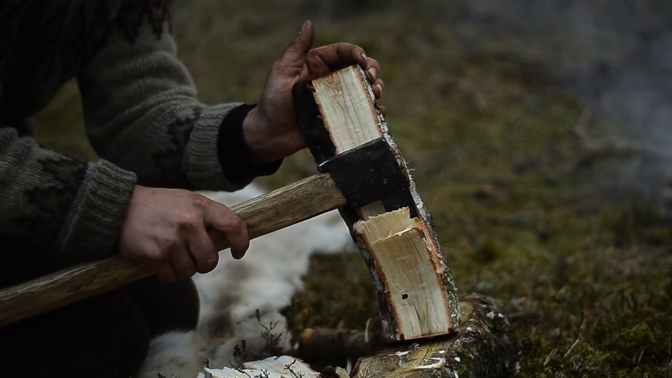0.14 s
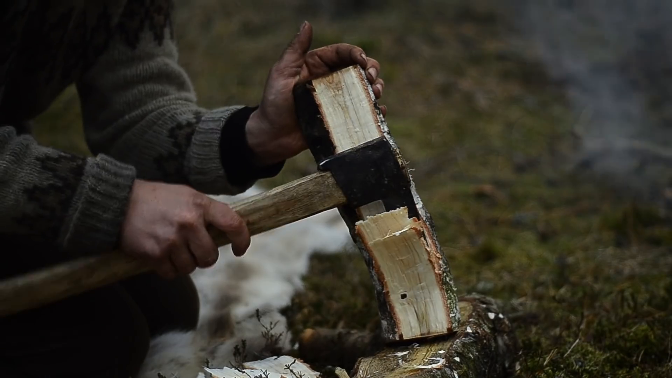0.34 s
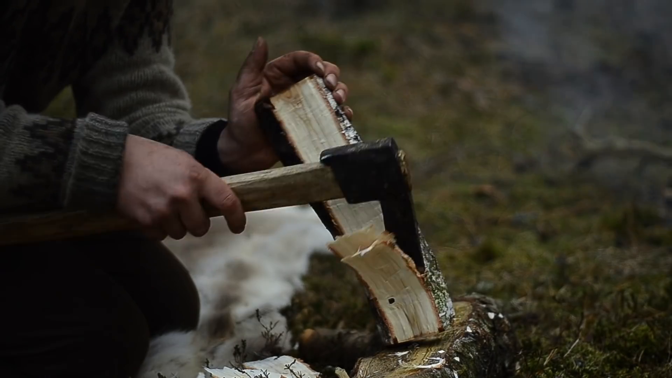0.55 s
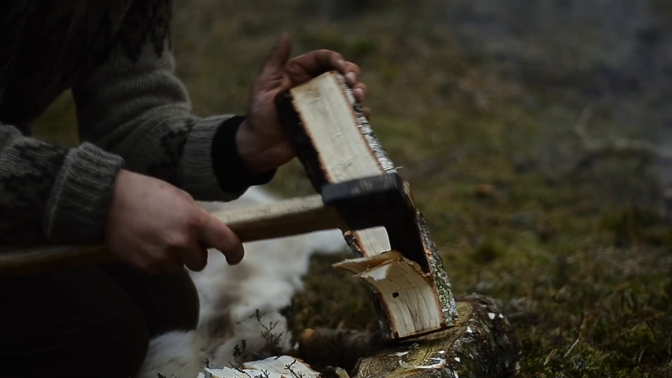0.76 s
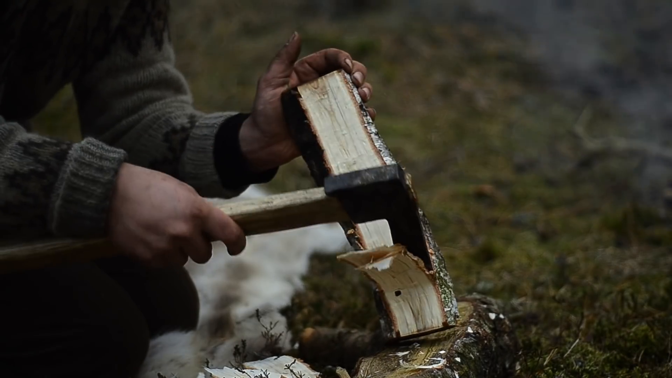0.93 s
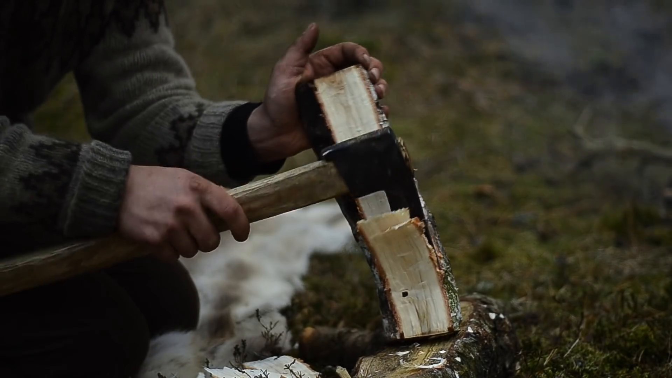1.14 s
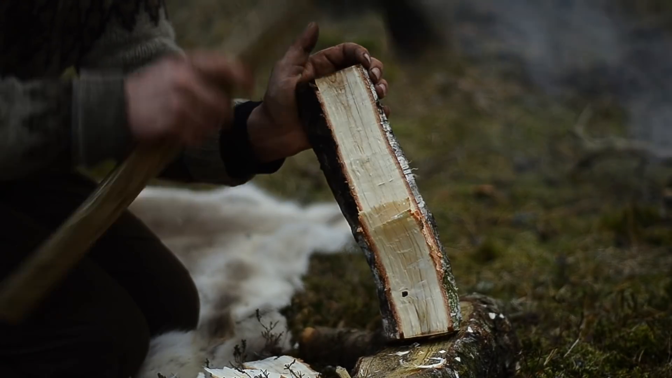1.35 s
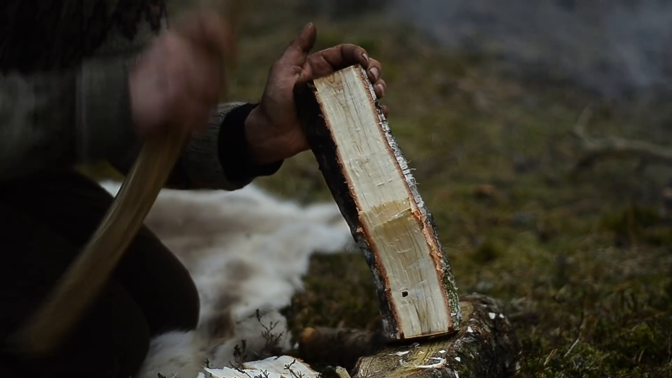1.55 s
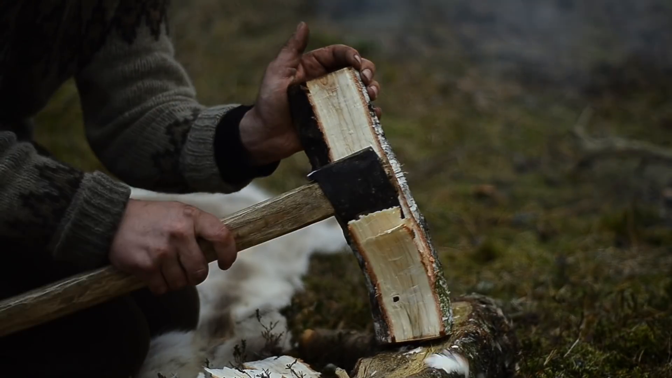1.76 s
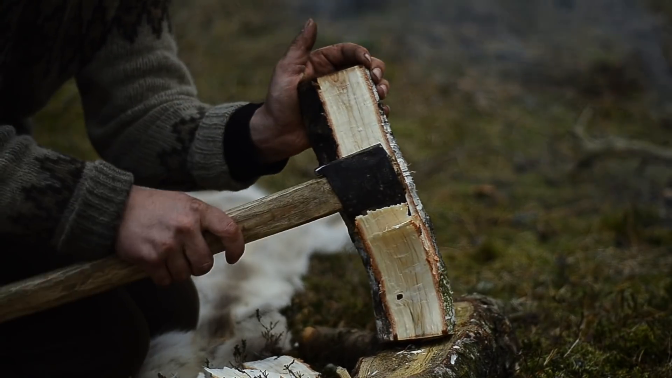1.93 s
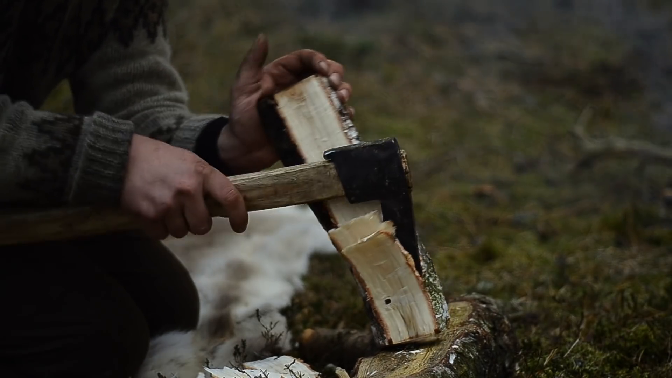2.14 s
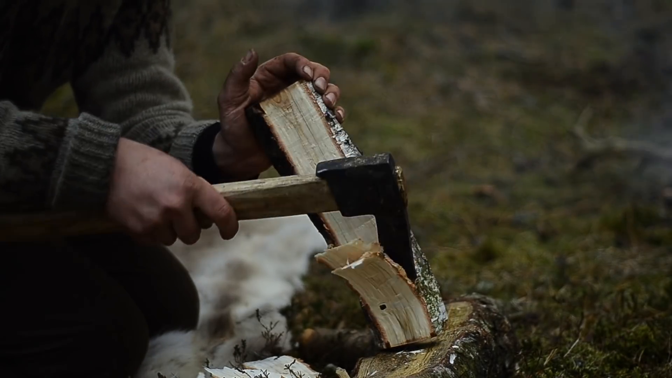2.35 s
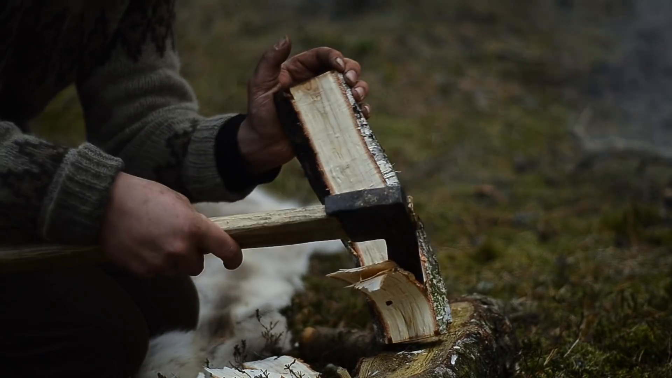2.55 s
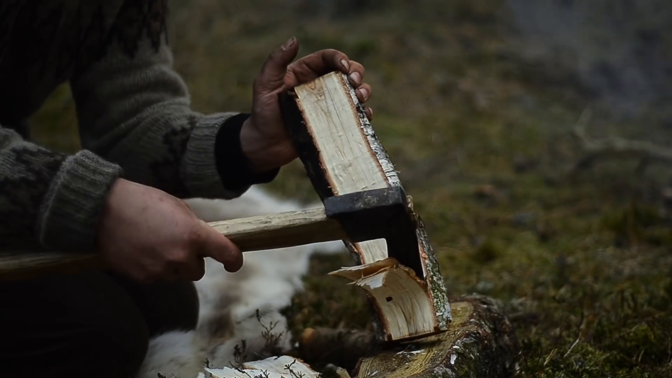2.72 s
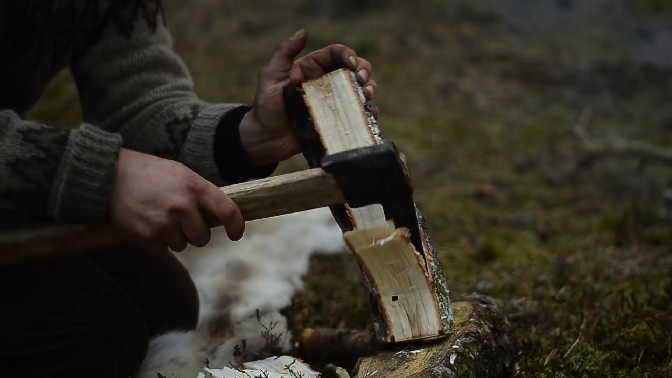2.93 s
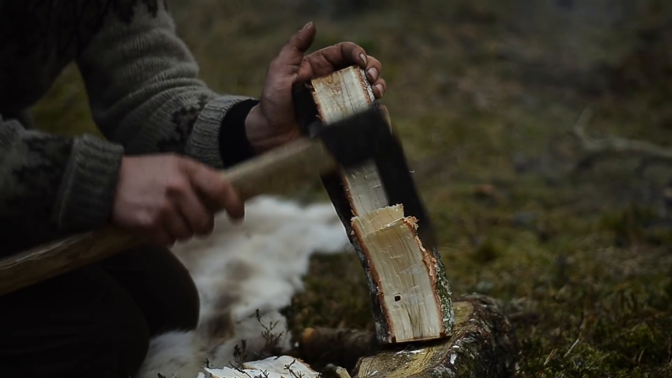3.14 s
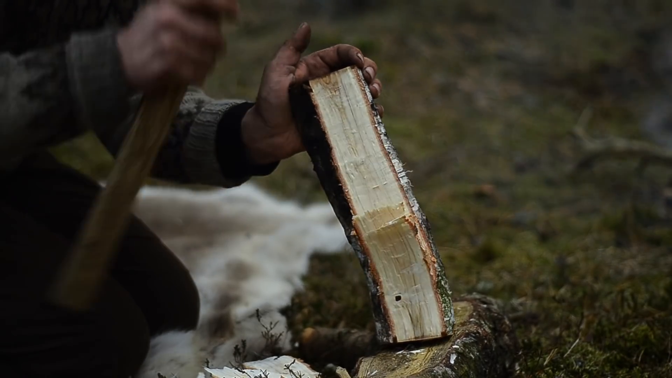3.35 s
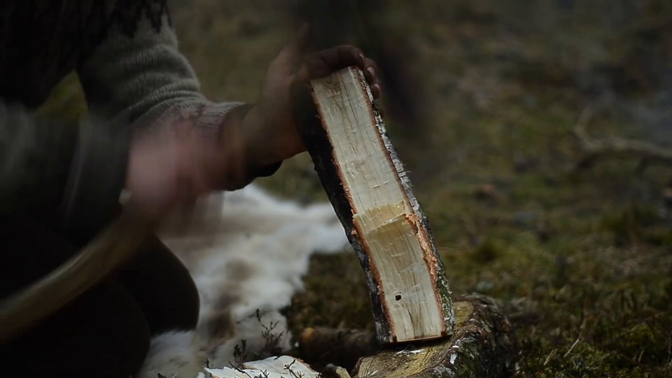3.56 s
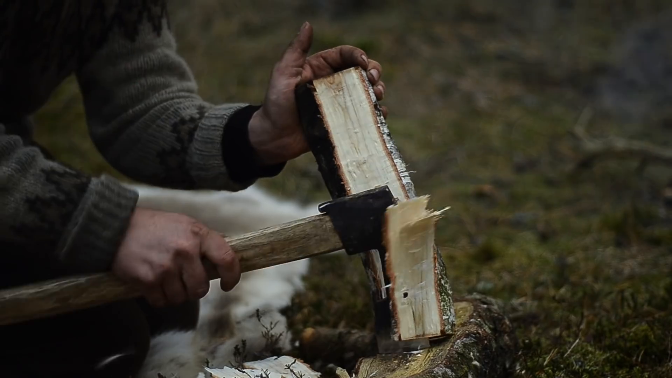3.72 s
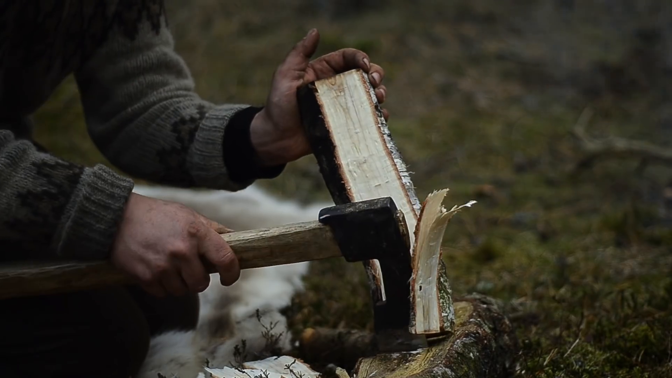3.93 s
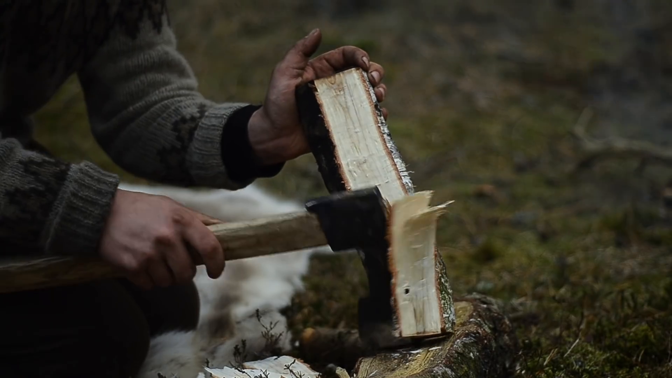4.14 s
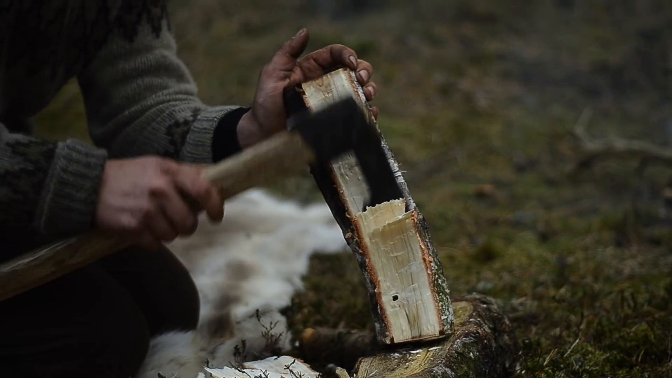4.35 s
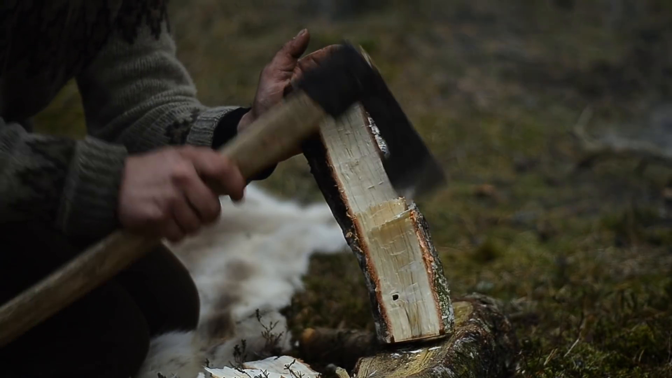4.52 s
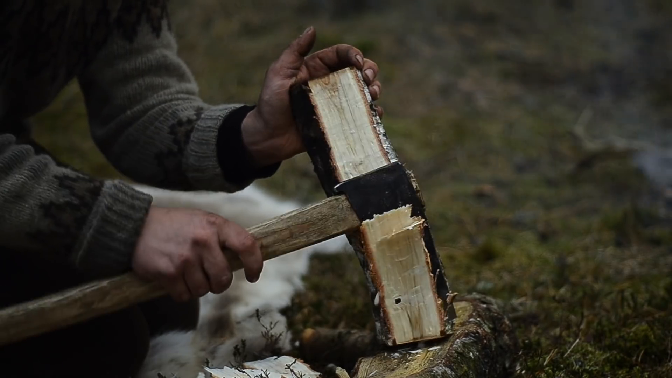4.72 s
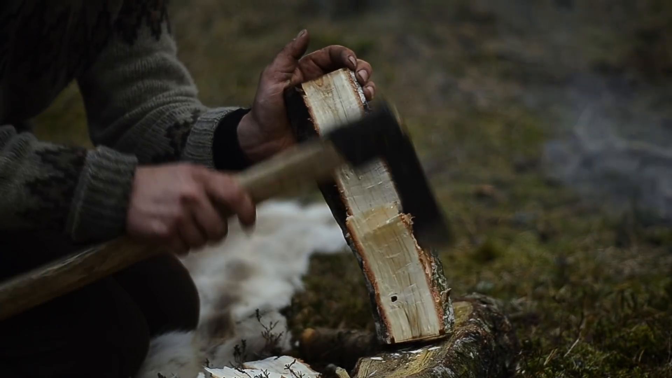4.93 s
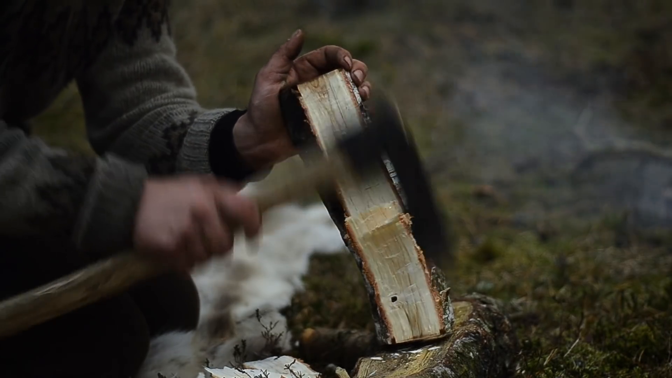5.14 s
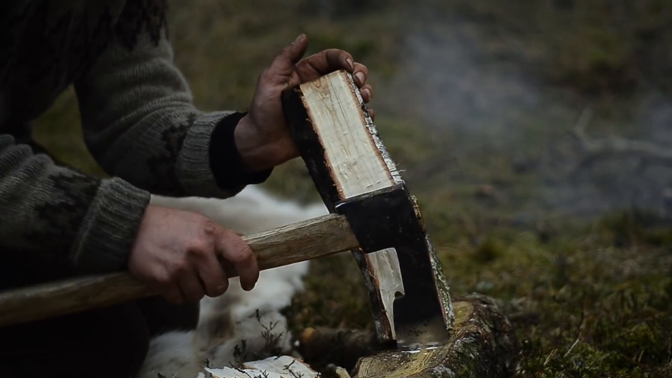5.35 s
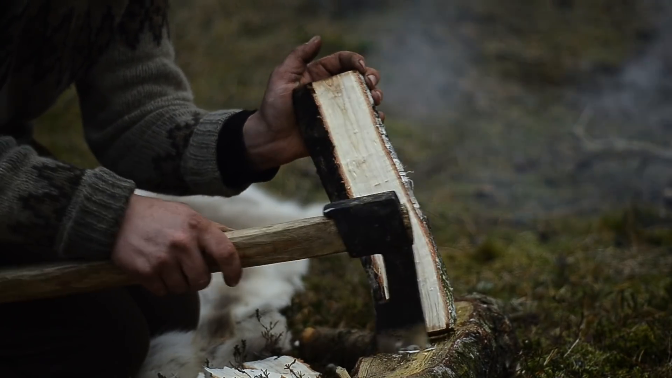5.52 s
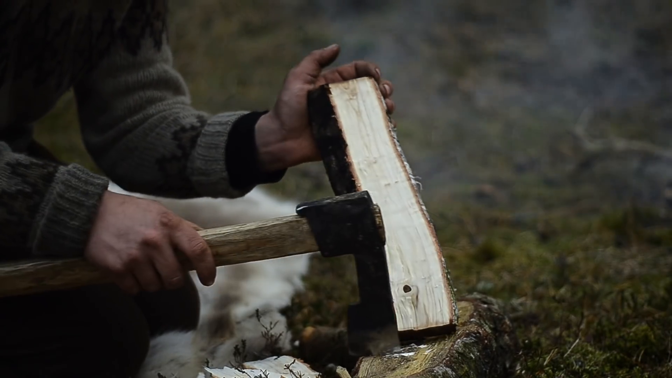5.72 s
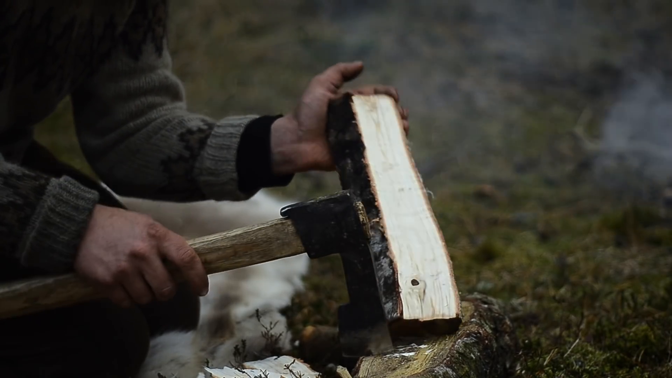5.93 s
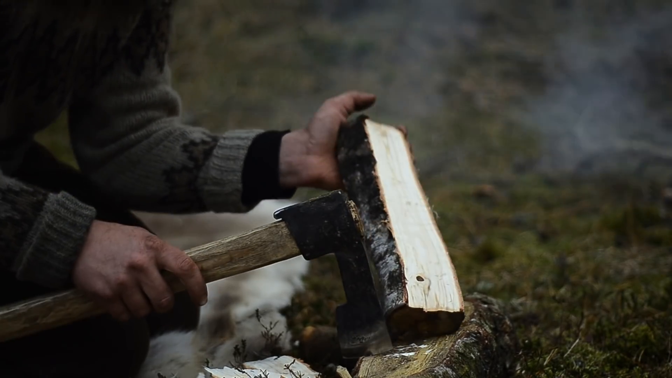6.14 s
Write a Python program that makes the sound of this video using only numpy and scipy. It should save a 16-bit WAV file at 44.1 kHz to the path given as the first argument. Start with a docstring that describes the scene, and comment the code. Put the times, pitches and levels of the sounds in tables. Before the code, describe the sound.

Outdoors and very close, a hand axe bites into a log with a loud, crunchy, overloaded wooden crack. Fibres snap as the blade is twisted. A second heavy blow follows, then a third that bites and knocks the block, with descending creaks. Smaller knocks and a soft scrape lead to a hollow thump as the slab gives way, then faint rubbing and one thin squeak. Soft air hush and slight echo.

```python
"""Outdoors, close to the microphone, a hand axe splits slabs off an upright log on a chopping block.
Heavy blows, made of crushed fibres and ringing wood, overload the recorder. Between them the blade is
twisted, fibres snap as short clicks, and steel rubs on wood as grainy noise, creaking and squeaking.
When a slab gives way the axe drives through and knocks on the block with a short hollow ring.
A soft hush and a faint echo lie behind it all."""
import sys
import numpy as np
from scipy import signal
from scipy.io import wavfile
from scipy.ndimage import uniform_filter1d

SR = 44100
rng = np.random.default_rng(int(sys.argv[2]) if len(sys.argv) > 2 else 0)


def dump(signal):
    """Clip the signal to [-1, 1] and save it as 16-bit WAV at the path in sys.argv[1]."""
    limited = np.clip(np.atleast_2d(signal).T, -1, 1)
    pcm = np.round(limited * 32767).astype(np.int16)
    wavfile.write(sys.argv[1], SR, pcm)


N = 272538  # samples in the whole scene


def amp(db):
    """Turns decibels into a gain."""
    return 10 ** (np.asarray(db) / 20)


def evened(x):
    """Scales a sound to an average (rms) strength of 1."""
    return x / np.sqrt(np.mean(x ** 2) + 1e-20)


def read_curve(points, hz):
    """Reads a curve between its points, along a logarithmic frequency axis."""
    f, value = np.transpose(points)
    return np.interp(np.log(hz + 1), np.log(f), value)


def add(mix, start_s, sound):
    """Mixes a sound in at its start time."""
    part = mix[round(start_s * SR):][:len(sound)]
    part += sound[:len(part)]


def clock(size=8192):
    """Seconds since the start of an event."""
    return np.arange(size) / SR


def dying(t, t60):
    """Falls by 60 dB in t60 seconds."""
    return np.exp(-np.log(1000) * t / t60)


def colour(x, points, size=4096):
    """Filters a sound to a given spectrum without smearing it to before its start."""
    hz = abs(np.fft.fftfreq(size, 1 / SR))
    log_gain = np.log(amp(read_curve(points, hz)))
    # minimum phase: the filter answers as early as it can
    response = np.exp(np.conj(signal.hilbert(log_gain)))
    taps = np.fft.ifft(response).real[:size // 2]
    return signal.fftconvolve(x, taps)[:len(x)]


def band(x, hz, spread):
    """Passes hz / spread to hz * spread, with soft skirts."""
    edges = [hz / spread, hz * spread]
    return signal.sosfilt(signal.butter(2, edges, "band", fs=SR, output="sos"), x)


def grains(size, grain_db):
    """Noise made of tiny slips of unequal strength, each 16 samples long."""
    strength = np.repeat(rng.standard_normal(size // 16 + 1), 16)[:size]
    return evened(rng.standard_normal(size) * amp(grain_db * np.clip(strength, -2, 2)))


def ring(modes, pitch=1, contact_hz=4500, sign=1):
    """Fading tones after one blow, rounded off by the give of the wood."""
    t = clock()
    swing = np.zeros(len(t))
    for k, (hz, db, t60) in enumerate(modes):
        # with sign -1, neighbouring tones start in opposite directions
        swing += sign ** k * amp(db) * dying(t, t60) * np.cos(2 * np.pi * hz * pitch * t)
    return signal.lfilter(*signal.butter(1, contact_hz, fs=SR), swing)


# the axe bites into the log:
# (time [s], level [dB], factor on the log's pitches [ratio], crunch level [dB], crunch t60 [s])
BITE_EVENTS = [(0.0016, -2.5, 0.921, -0.5, 0.0542), (1.7037, 2, 0.9686, 1, 0.03314),
               (3.659, -2.5, 1.0, 0, 0.0732), (3.6634, -1, 0.8575, -4.5, 0.046)]
# tones of the log before the pitch factor: (frequency [Hz], level [dB], t60 [s])
LOG_MODES = [(357, -21, 0.03), (590, -16, 0.021), (856.8, -1, 0.037), (1066, -11, 0.029),
             (1233.2, -2, 0.021), (1314, -12, .018), (1770.4, -5.5, 0.045), (2200, -6, 0.011),
             (3000, -12, 0.004), (4500, -13, 0.002)]
# tone colour of crushed fibres: (frequency [Hz], relative level per Hz [dB])
CRUNCH_SPECTRUM = [(30, -9.5), (150, -9.5), (400, -1), (900, 3.5), (2300, 4.5), (4800, -7.5), (8000, -17),
                   (15000, -20.5)]


def bites():
    """The edge crushes fibres for some milliseconds, shoves the log down and sets it ringing."""
    out, t = np.zeros(N), clock()
    shove = push(t, rise=0.0015)
    for start_s, db, pitch, crunch_db, t60 in BITE_EVENTS:
        crunch = evened(colour(grains(len(t), grain_db=2.5), CRUNCH_SPECTRUM)) * dying(t, t60)
        log = ring(LOG_MODES, pitch, sign=-1)
        blow = amp(1.5) * log + amp(crunch_db - 0.28) * crunch + amp(-3.5) * shove
        add(out, start_s, amp(db) * blow)
        add(out, start_s, amp(db) * rumble())
    return out


def push(t, rise):
    """The shove of the axe's weight: a low pulse that swings over as it fades."""
    return (1 - t / rise / 2) * t / rise * np.exp(-t / rise)


def rumble(level_db=-42, t60=0.45, top_hz=58):
    """A faint deep-bass rumble, below about 60 Hz, follows a heavy blow and fades."""
    t = clock(size=22050)
    lowpass = signal.butter(2, top_hz, fs=SR, output="sos")
    low = signal.sosfilt(lowpass, rng.standard_normal(len(t)))
    return amp(level_db) * evened(low) * dying(t, t60)


# knocks on the block: (time [s], force [dB], how squarely the blow lands [0-1])
KNOCK_EVENTS = [(0.0075, -14, 0.86), (0.043, -36, 0.75), (0.092, -41.5, 1), (0.4307, -39.5, 0.98),
                (3.683, -3.5, .6), (3.8945, -39, 0.39), (4.2790, -41, .05), (4.6540, -12.5, 0.24),
                (5.2193, -20, 0.04), (5.2618, -3, 0.93), (5.3622, -25.5, 0.32), (5.421, -36.5, 0),
                (5.647, -26, 0)]
# hollow ring of a blow that drives through: (frequency [Hz], level [dB], t60 [s])
HOLLOW_MODES = [(995, -4, 0.046), (1069, -25.5, 0.084), (2050, -34, 0.042), (2589, -36.5, 0.073),
                (4450, -37, 0.027)]
# steel head of the axe: (frequency [Hz], level [dB], t60 [s])
STEEL_MODES = [(2400, -22.5, .05), (4500, -23.5, 0.059)]
GIVE_HZ = 5000  # the block yields, so a knock rings little above this
HOLLOW_DB = 9.5  # a square blow rings above its thud
# the crack of contact grows more slowly than the force, and is duller in a harder blow
CRACK_DB, CRACK_GROWTH = -14.5, 0.66  # level at 0 dB force [dB]; dB of crack per dB of force
CRACK_HZ, CRACK_FALL_HZ_PER_DB = 1090, 14.5  # centre at 0 dB force; fall with force


def knocks():
    """A brief crack that stings the steel, the block's thud and, the squarer the hit, a hollow ring."""
    out, t = np.zeros(N), clock()
    give = signal.butter(2, GIVE_HZ, fs=SR, output="sos")
    sources = [thud(), ring(HOLLOW_MODES, contact_hz=2460), ring(STEEL_MODES)]
    block, hollow, steel = signal.sosfilt(give, sources)
    for start_s, db, square in KNOCK_EVENTS:
        crack_hz = CRACK_HZ - CRACK_FALL_HZ_PER_DB * db
        crack = evened(band(rng.standard_normal(len(t)), crack_hz, 2.3)) * dying(t, 0.022)
        contact = amp(CRACK_DB + CRACK_GROWTH * db) * (crack + amp(-6) * steel)
        through = square * amp(db + HOLLOW_DB)
        add(out, start_s, amp(db) * block + through * hollow + contact)
        add(out, start_s, through * amp(-8) * rumble())
    return out


# dull tones of the block: (frequency [Hz], level [dB], t60 [s])
BLOCK_MODES = [(215, -16, 0.028), (301, -10, .04), (360, -7, 0.032), (474, -6, 0.028), (551, -4.5, 0.026),
               (724, -6.5, 0.015), (920, -10, 0.0053)]


def thud(lowest_hz=235):
    """The block's answer to a blow; it is too small to radiate deep bass."""
    highpass = signal.butter(2, lowest_hz, "high", fs=SR, output="sos")
    return signal.sosfilt(highpass, ring(BLOCK_MODES, contact_hz=1480))


# thick fibres snap: (time [s], relative level [dB], centre frequency [Hz])
SNAP_EVENTS = [(0.6871, -21.5, 2520), (0.7420, -18.5, 5230), (0.7717, 0, 3050), (0.8330, -12, 1957),
               (1.6940, -0.5, 2680), (2.1038, -17, 2100), (2.535, -15.5, 4030), (2.5404, -8.5, 3010),
               (2.542, -7, 2720), (2.6032, -18.5, 5890), (2.6350, -14, 6500), (3.093, -11.5, 2430),
               (3.8277, -13, 2580), (3.8355, -19, 4550), (4.3502, -33, 2780), (4.8004, -30.5, 1590),
               (4.8782, -27.5, 3500), (5.2427, -11, 1100), (5.3190, -17.5, 1660), (5.421, -22.5, 4040)]


def snaps():
    """The thick fibres that give way one by one."""
    out = np.zeros(N)
    for start_s, db, hz in SNAP_EVENTS:
        add(out, start_s, snap(db, hz))
    return out


def snap(db, hz):
    """A fibre breaks with one sharp click; the wood around it rattles for a few milliseconds."""
    t = clock(size=2048)
    force = 0.17 * rng.standard_normal(len(t)) * dying(t, 0.011)
    force[0] += 1  # the break itself
    click = band(force, hz, 1.7) + amp(-10.5) * band(force, 2.2 * hz, 1.4)
    # the louder the snap, the larger the log's share in it
    body = amp(-33 + 0.25 * db) * ring(LOG_MODES)[:len(t)] * dying(t, 0.067)
    return amp(db + 7.5) * (click / np.linalg.norm(click) + body)


# the blade is twisted in the cleft:
# (time of greatest strain [s], reach before and after [s], relative level [dB])
TWIST_EVENTS = [(0.791, 0.0595, -23), (1.17, 0.156, -44), (2.4, 0.0443, -32), (2.51, 0.0792, -22.5),
                (2.73, .04, -30.5), (3.786, 0.0493, -21.5), (4.329, .14, -39.5), (4.711, .04, -25.5),
                (5.47, 0.0883, -38.5)]
CRACKLE_GAP_S = 0.014  # mean spacing
CRACKLE_FADE_DB = -16  # drop at the ends of a twist
# the random scatter reaches about twice each spread
CRACKLE_SPREAD_DB = 3.5
CRACKLE_HZ, CRACKLE_SPREAD_OCTAVES = 3363, 0.47


def crackle(count=20):
    """Thin fibres break at uneven intervals in each twist, on average loudest where the strain peaks."""
    out, steps = np.zeros(N), np.arange(-count, count)
    for peak_s, reach, db in TWIST_EVENTS:
        offsets = CRACKLE_GAP_S * (steps + rng.random(len(steps)))
        fibres = rng.uniform(-2, 1.97, (len(steps), 2))
        for offset, (strength, thinness) in zip(offsets, fibres):
            if abs(offset) < reach:
                level = db + CRACKLE_FADE_DB * abs(offset) / reach + CRACKLE_SPREAD_DB * strength
                hz = CRACKLE_HZ * 2 ** (CRACKLE_SPREAD_OCTAVES * thinness)
                add(out, peak_s + offset, snap(level, hz))
    return out


# the half-split slab creaks in single slips: time of each [s]
CREAK_TIMES = [3.7404, 3.7433, 3.7742, 3.7970, 3.9290, 4.0055]
# relative level and pitch of the first slip, and how fast both sink
CREAK_DB, CREAK_FADE_DB_PER_S = -23.5, 46
CREAK_HZ, CREAK_SAG_HZ_PER_S = 1906, 1090


def creaks(t60=0.00816, rise=0.000457):
    """Each slip plucks the slab, whose note weakens and sinks as the split grows longer."""
    out, t = np.zeros(N), clock(size=2048)
    for start_s in CREAK_TIMES:
        age = start_s - CREAK_TIMES[0]
        hz = CREAK_HZ - CREAK_SAG_HZ_PER_S * age
        note = np.sin(2 * np.pi * hz * t) * (1 - np.exp(-t / rise)) * dying(t, t60)
        rasp = band(rng.standard_normal(len(t)), 2520, 2.12) * dying(t, 0.0099)
        level = amp(CREAK_DB - CREAK_FADE_DB_PER_S * age)
        add(out, start_s, level * (amp(9.5) * note + amp(-11.5) * rasp))
    return out


# the blade tears along the grain:
# (time [s], approximate length [s], relative level [dB], centre frequency [Hz])
TEAR_EVENTS = [(1.689, 0.0113, -19.5, 2750), (2.12, 0.0293, -42, 1900), (4.662, 0.0392, -25, 2200),
               (5.2336, 0.034, -19.5, 1563), (5.25, 0.011, -23.5, 3500), (5.323, 0.0279, -35.5, 3340)]


def tears(block_db=-8):
    """Dense runs of breaking fibres as the wedge runs down the grain; the block murmurs along."""
    out, t = np.zeros(N), clock()
    for start_s, length, db, hz in TEAR_EVENTS:
        slips = grains(len(t), grain_db=4.5)
        murmur = evened(signal.fftconvolve(slips, thud())[:len(t)])
        run = evened(band(slips, hz, 2.1)) + amp(block_db) * murmur
        swell = (1 - np.exp(-t / (0.25 * length))) * np.exp(-(t / (0.85 * length)) ** 3)
        add(out, start_s, amp(db + 1.5) * run * swell)
    return out


# strokes of steel and hand on the wood:
# (time when pressed hardest [s], level [dB], time to fade by 20 dB [s])
RUB_STROKES = [(0.489, -49, 0.2714), (1.28, -55, 0.06), (2.185, -51.5, 0.13), (2.915, -57, 0.35),
               (3.17, -61, 0.1), (3.325, -56.5, 0.0032), (3.79, -50, 0.3182), (4.16, -59.5, 0.0341),
               (4.31, -55.5, 0.45), (4.985, -38, 0.0548), (5.37, -48.5, 0.177), (5.61, -55.5, 0.3055),
               (5.97, -58.5, 0.44)]
# tone colour of the rubbing: (frequency [Hz], relative level per Hz [dB])
RUB_SPECTRUM = [(200, -30.5), (900, -2.5), (1900, 8.5), (3200, 1), (4900, -4), (8500, -10.5), (15000, -12)]
RUB_ATTACK_S = 0.04


def rubs(grit_db=2):
    """Fine-grained friction that catches on the rough wood; each stroke swells quickly and trails off."""
    t, level = clock(size=N), np.zeros(N)
    for peak_s, db, fade in RUB_STROKES:
        swell = np.exp(-(np.minimum(t - peak_s, 0) / RUB_ATTACK_S) ** 2)
        level += amp(db - 20 * np.maximum(t - peak_s, 0) / fade) * swell
    catches = evened(uniform_filter1d(rng.standard_normal(N), size=130))
    friction = colour(grains(N, grain_db=3.5), RUB_SPECTRUM)
    return level * evened(friction * amp(grit_db * catches))


# the wedged blade squeaks once: the pressure builds and eases, and pulls the pitch down
SQUEAK_PEAK_S, SQUEAK_DB, SQUEAK_RISE_S, SQUEAK_FALL_S = 5.605, -50, 0.041, 0.11
SQUEAK_HZ, SQUEAK_SAG_HZ = 2150, 160.03  # pitch without pressure; drop at full pressure


def squeak(width_hz=70, unsteady=0.65, upper_db=-10, top_db=-21):
    """Steel sticks and slips in the cleft: a thin, rough whistle with two faint partners above it."""
    t = clock(size=N) - SQUEAK_PEAK_S
    pressure = np.exp(np.minimum(t / SQUEAK_RISE_S, -t / SQUEAK_FALL_S))
    smooth = signal.butter(2, width_hz, fs=SR, output="sos")
    # slow random wavering of loudness and of pitch
    swell, drift = evened(signal.sosfilt(smooth, rng.standard_normal((2, N))))
    hz = (SQUEAK_HZ - SQUEAK_SAG_HZ * pressure) * (1 + 0.008 * drift)
    angle = 2 * np.pi * np.cumsum(hz) / SR
    partners = amp(upper_db) * np.sin(2.24 * angle) + amp(top_db) * np.sin(4.36 * angle)
    whistle = np.sin(angle) + partners
    return amp(SQUEAK_DB) * pressure * (1 + unsteady * swell) * whistle


def splinters(per_s=14, level_db=-54, spread_db=3):
    """Faint stray ticks of bark and splinters, at random times and of random strength."""
    strength = amp(spread_db * np.minimum(rng.exponential(1, N), 3))
    hits = strength * (rng.random(N) < per_s / SR)
    t = clock(size=512)
    tick = band(rng.standard_normal(len(t)) * dying(t, 0.01), 2400, 2)
    return amp(level_db) * signal.fftconvolve(hits, tick)[:N]


# tone colour of the echo: (frequency [Hz], relative level [dB])
ECHO_SPECTRUM = [(100, -6.5), (450, -6.5), (850, -7), (1600, -4.5), (2800, -3), (4900, 2.5), (8000, -1),
                 (15000, -6.5)]
# how long the echo lasts: (frequency [Hz], t60 [s])
ECHO_DECAY = [(100, 0.16), (700, 0.36), (2000, 0.4), (5000, 0.21), (12000, 0.21)]


def clearing(x, wet_db):
    """Ground and trees scatter a short, faint tail of uneven little echoes."""
    hz, t, z = signal.stft(grains(SR, grain_db=4.5), SR, nperseg=256)
    gain = amp(read_curve(ECHO_SPECTRUM, hz))[:, None]
    z = z * gain * dying(t, read_curve(ECHO_DECAY, hz)[:, None])
    tail = signal.istft(z, SR, nperseg=256)[1]
    # the echoes build up over a few milliseconds
    tail = tail * (1 - np.exp(-clock(size=len(tail)) / 0.0045))
    return amp(wet_db) * signal.fftconvolve(x, tail / np.linalg.norm(tail))[:N]


# tone colour of the outdoor air: (frequency [Hz], relative level per Hz [dB])
AIR_SPECTRUM = [(25, -4), (60, -3), (180, 2.5), (400, -4.5), (1000, -10), (2500, -17.5), (5000, -22.5),
                (9000, -28), (15000, -28)]
AIR_DB = -57.5  # rms level before the microphone


def air():
    """Steady, soft outdoor hush made of coloured noise."""
    return amp(AIR_DB) * evened(colour(rng.standard_normal(N), AIR_SPECTRUM))


def scene():
    """All the work at the block, with its echo and the air around it."""
    work = bites() + knocks() + snaps() + crackle() + creaks()
    work += tears() + rubs() + squeak() + splinters()
    return (work + clearing(work, wet_db=-24.5) + air())[None]


# how the microphone colours sound: (frequency [Hz], gain [dB])
MICROPHONE_RESPONSE = [(20, 0.5), (4000, 0.5), (5100, -1), (5700, -9), (7000, -2), (8500, 3.5), (9700, -7),
                       (13000, -5), (16000, -10.5)]
EDGE_HZ = 15900  # the recorder passes little above this


def record(dry):
    """Microphone colour, hard overload of whatever exceeds full scale, then the band limit."""
    clipped = np.clip(colour(dry[0], MICROPHONE_RESPONSE), -1, 1)
    lowpass = signal.firwin(255, EDGE_HZ, window=("kaiser", 9), fs=SR)
    return signal.fftconvolve(clipped, lowpass, "same")[None]


dry = scene()
out = record(dry)
dump(out)
```